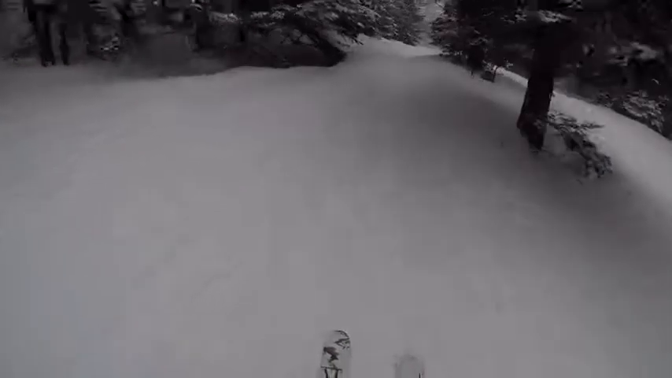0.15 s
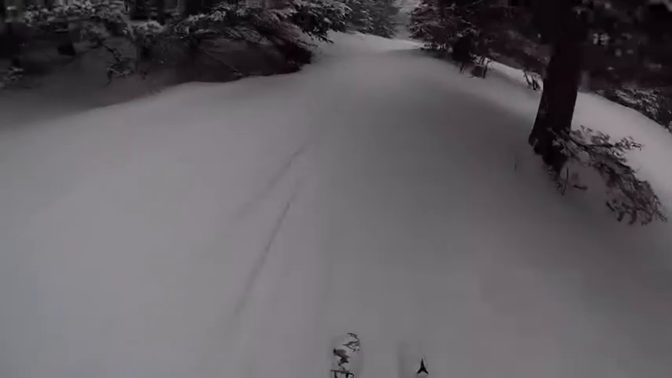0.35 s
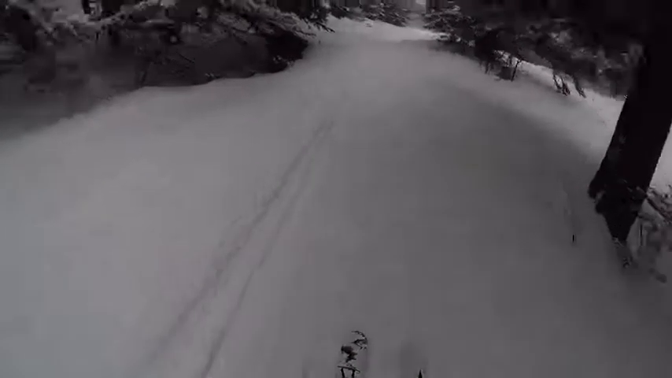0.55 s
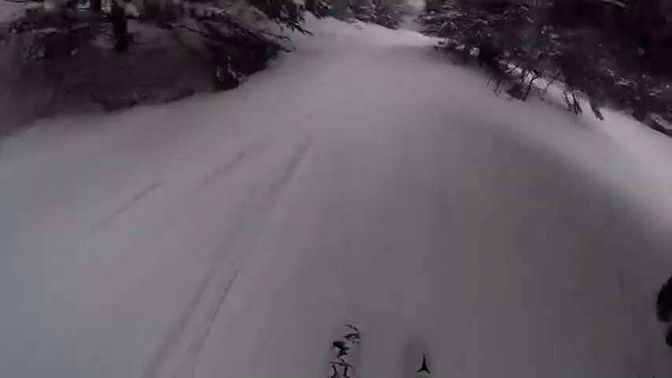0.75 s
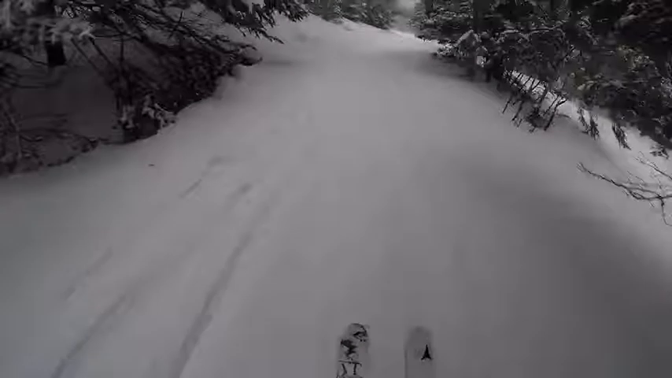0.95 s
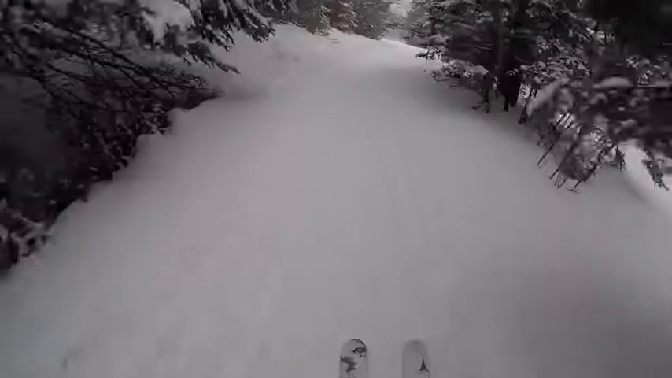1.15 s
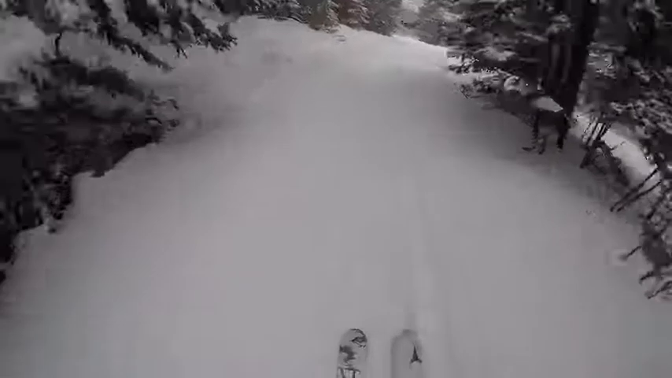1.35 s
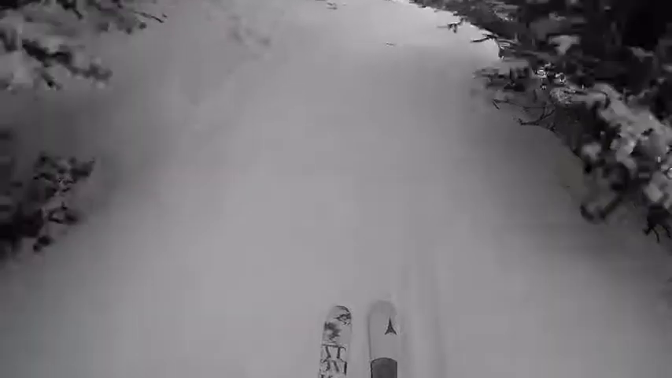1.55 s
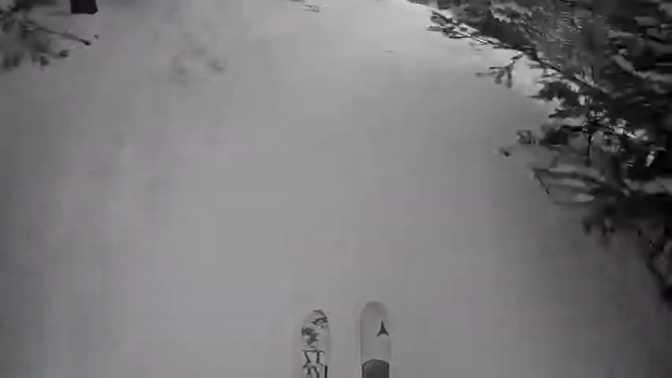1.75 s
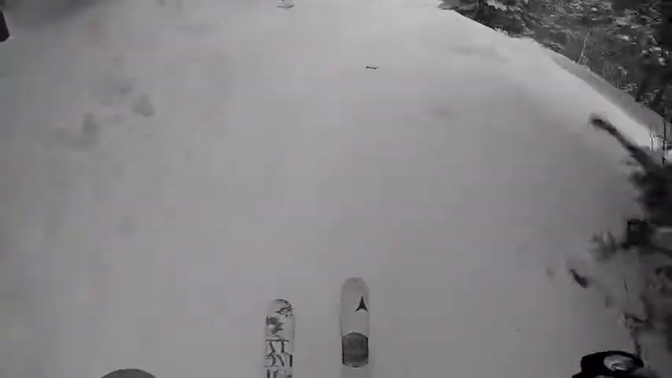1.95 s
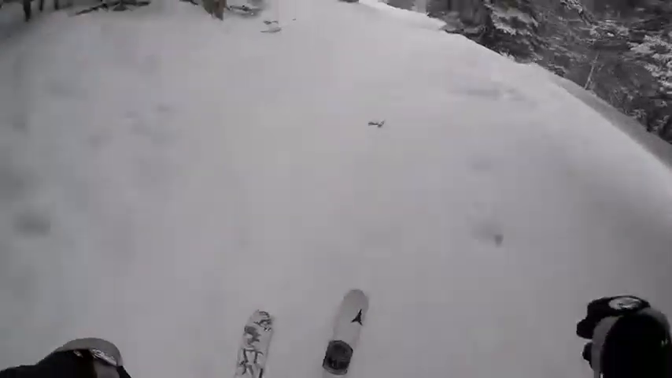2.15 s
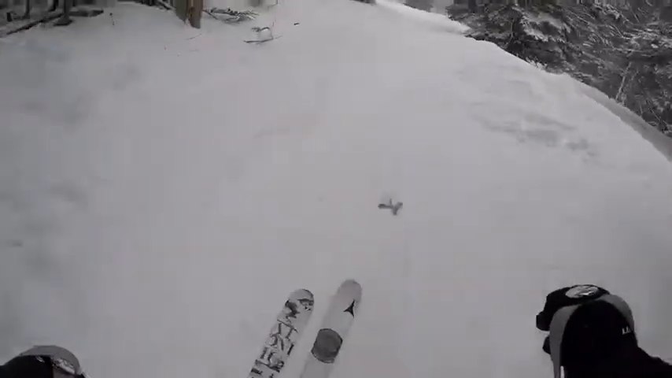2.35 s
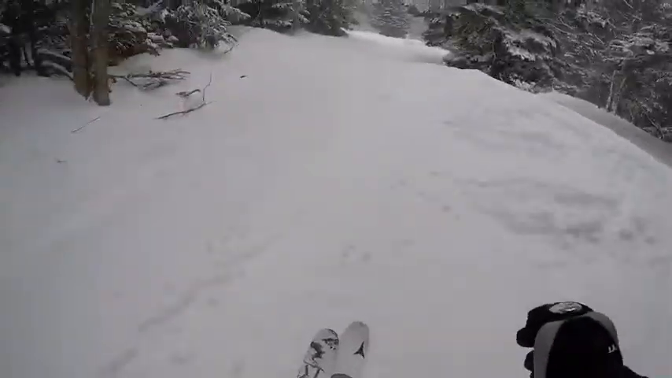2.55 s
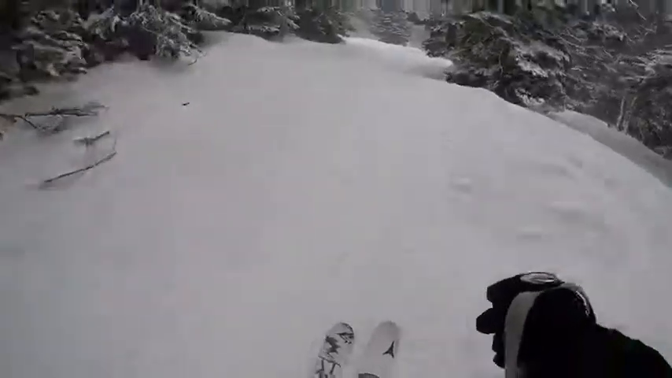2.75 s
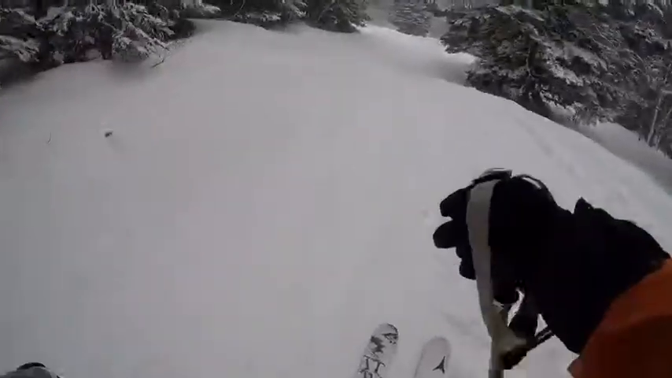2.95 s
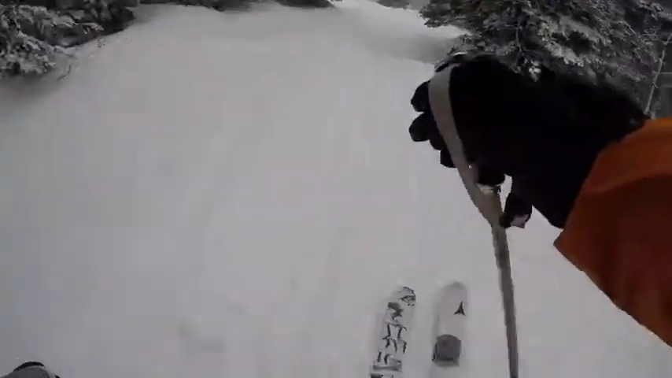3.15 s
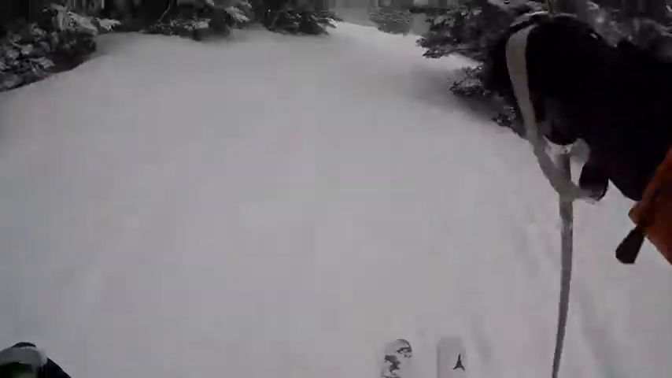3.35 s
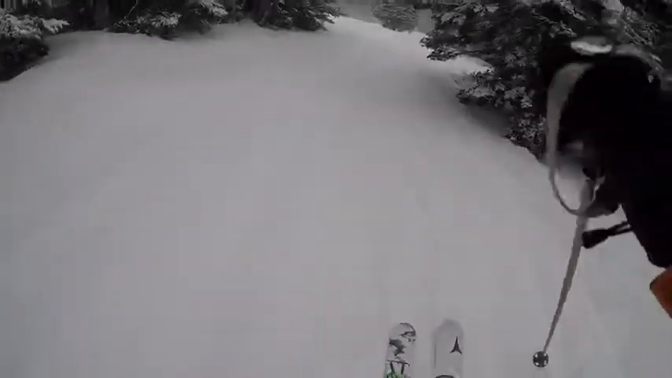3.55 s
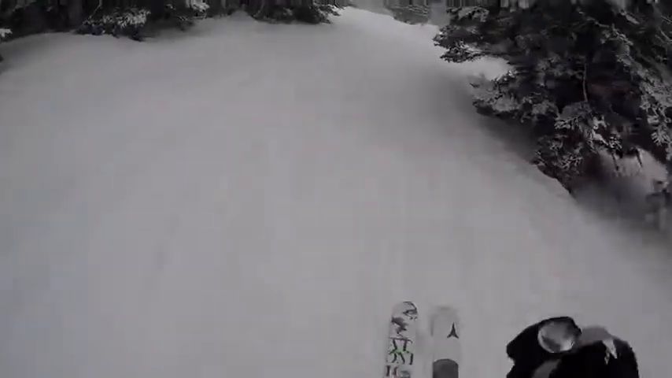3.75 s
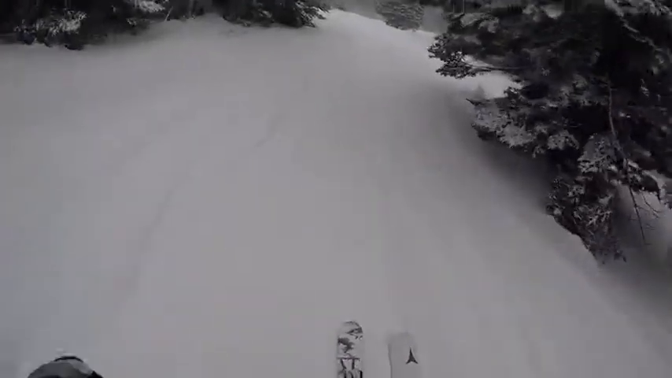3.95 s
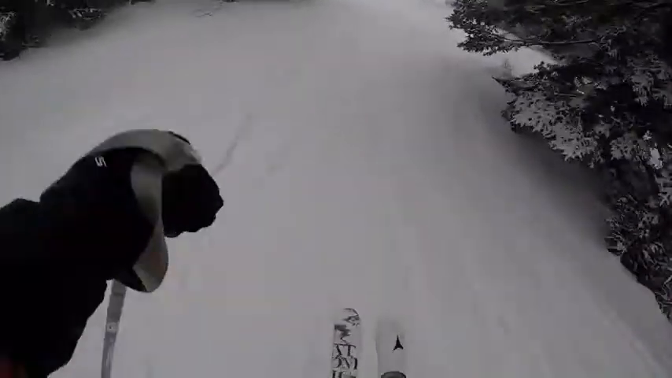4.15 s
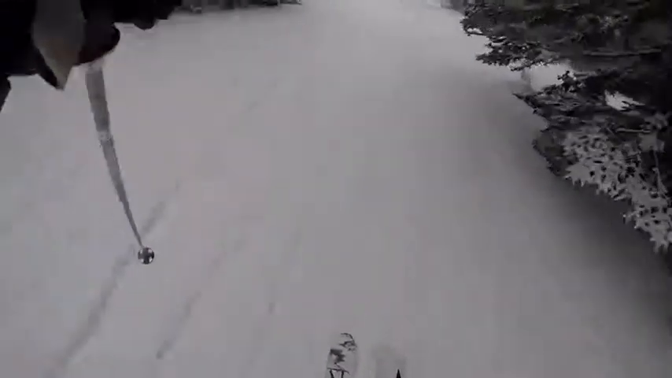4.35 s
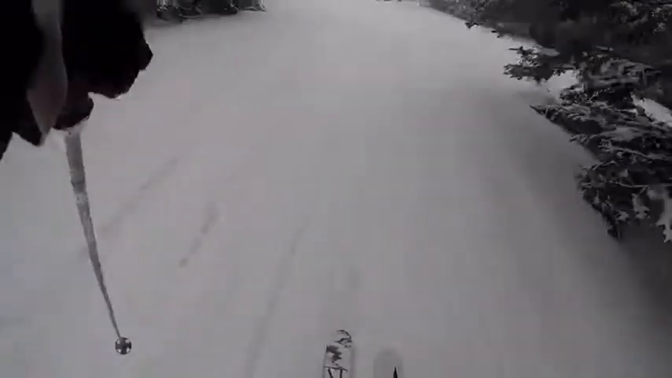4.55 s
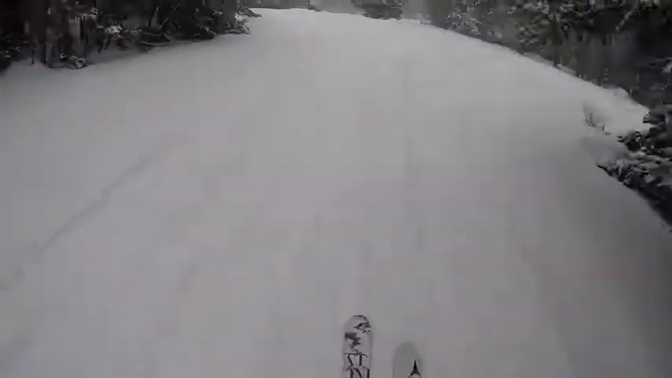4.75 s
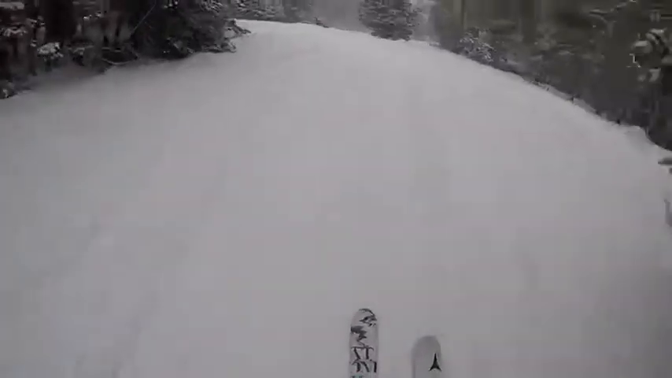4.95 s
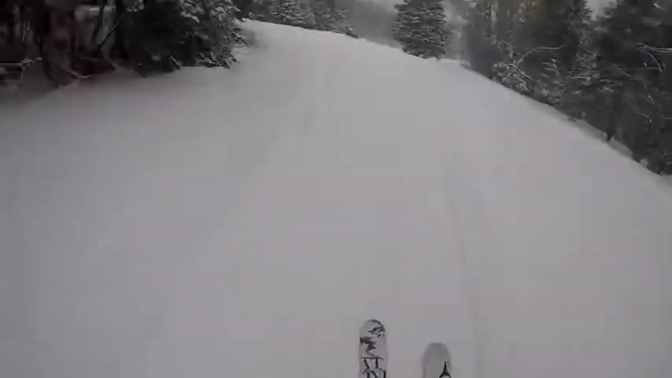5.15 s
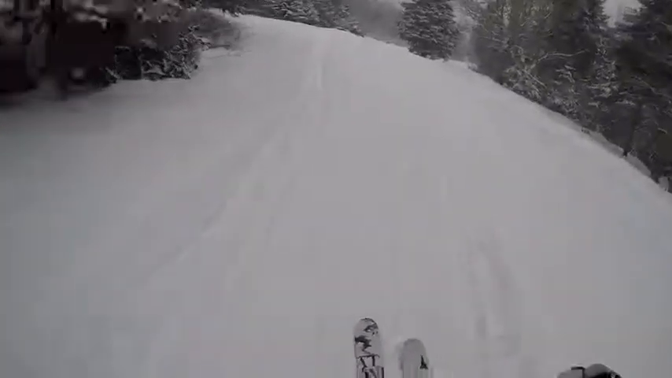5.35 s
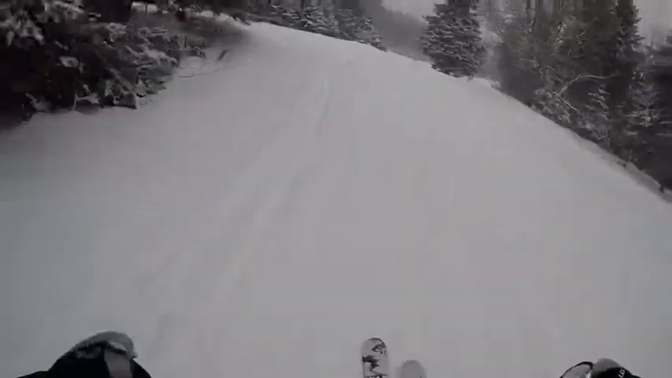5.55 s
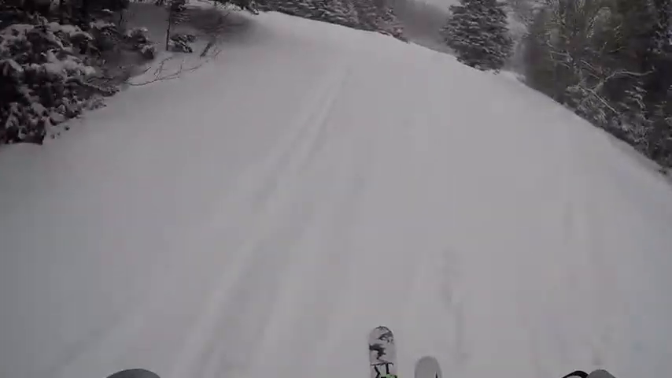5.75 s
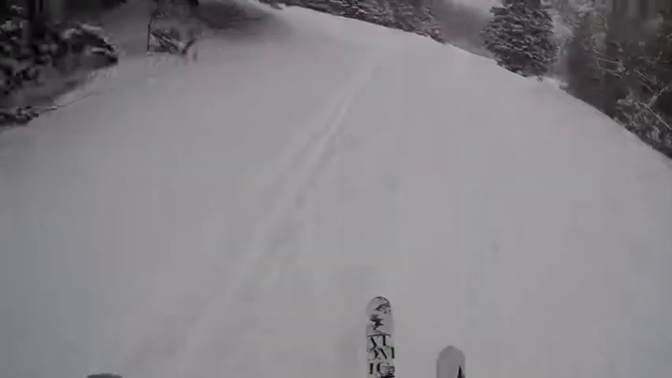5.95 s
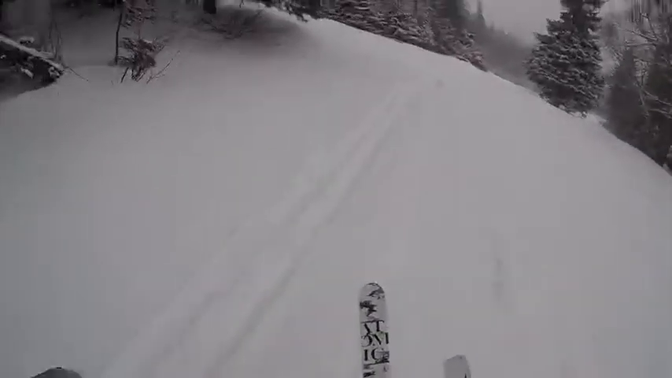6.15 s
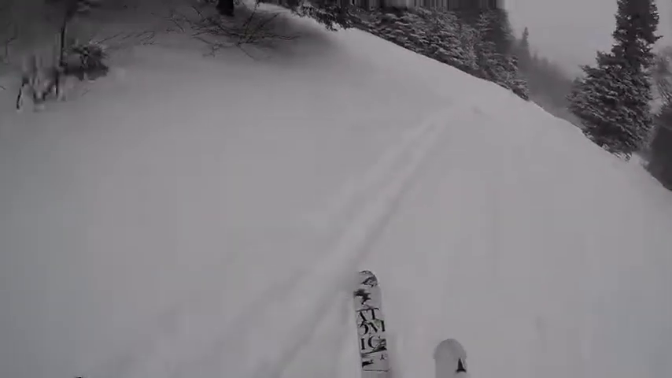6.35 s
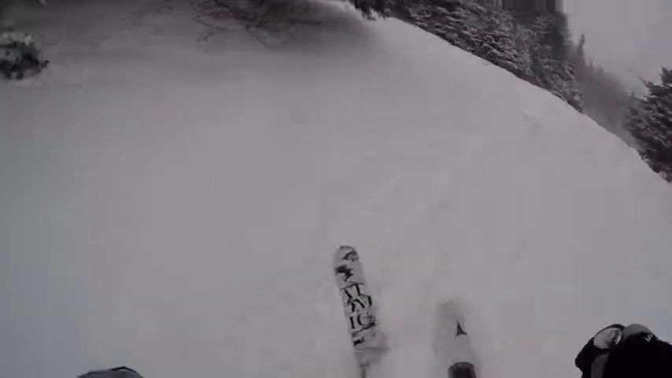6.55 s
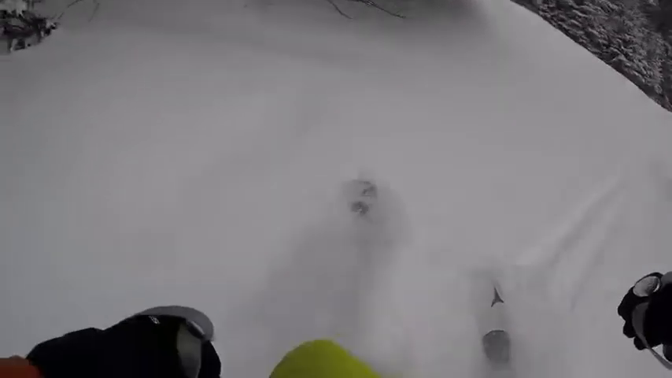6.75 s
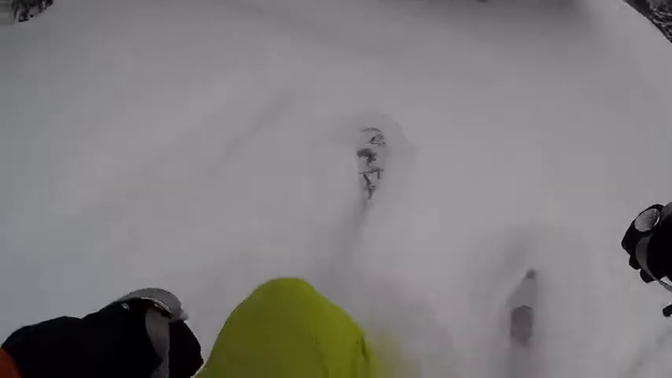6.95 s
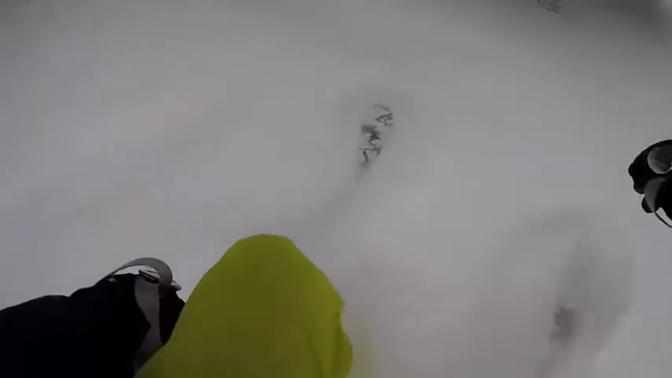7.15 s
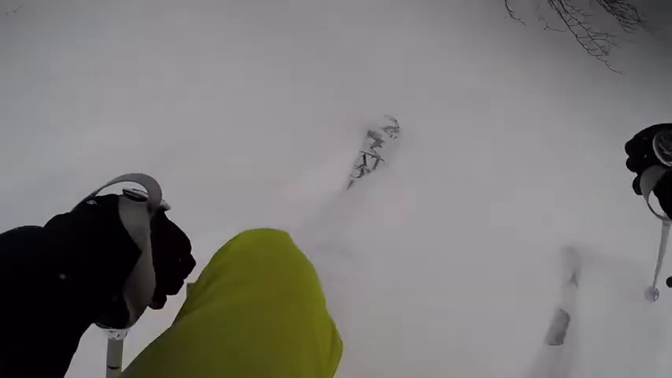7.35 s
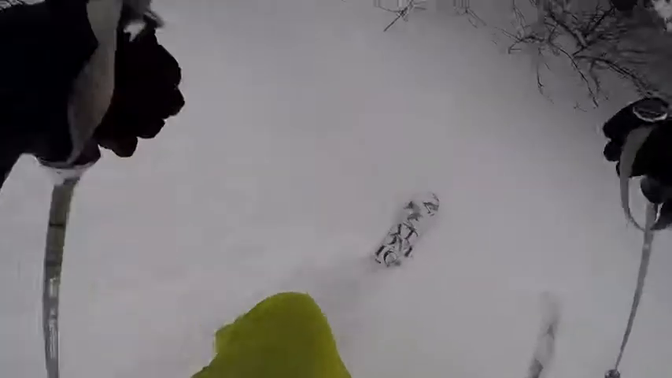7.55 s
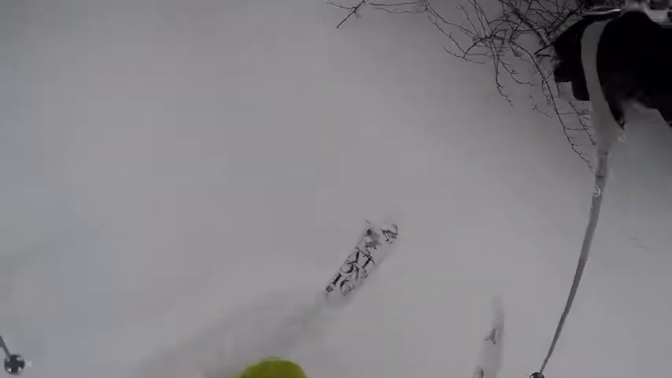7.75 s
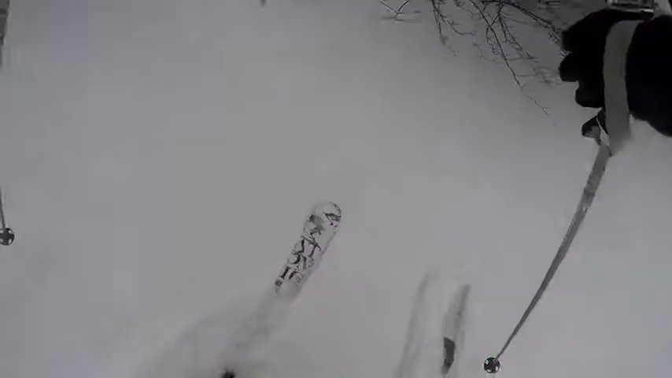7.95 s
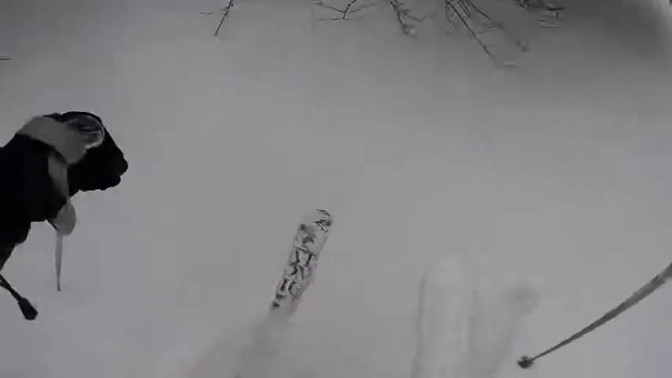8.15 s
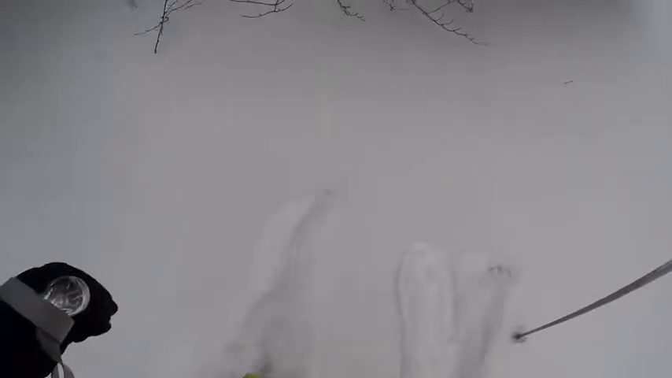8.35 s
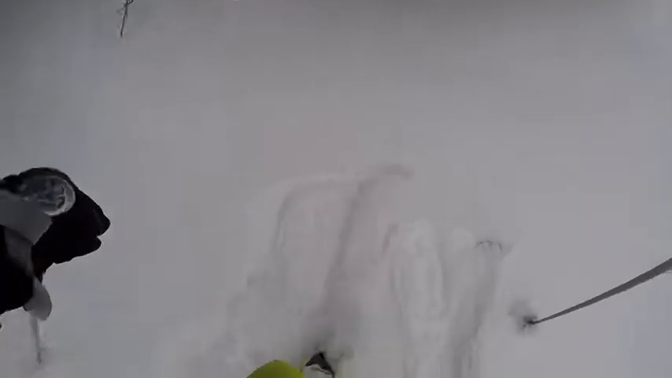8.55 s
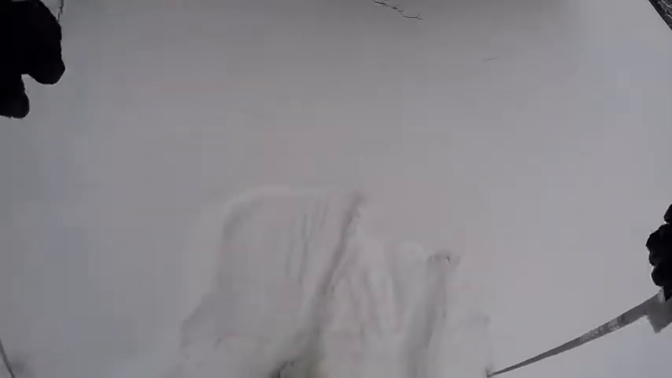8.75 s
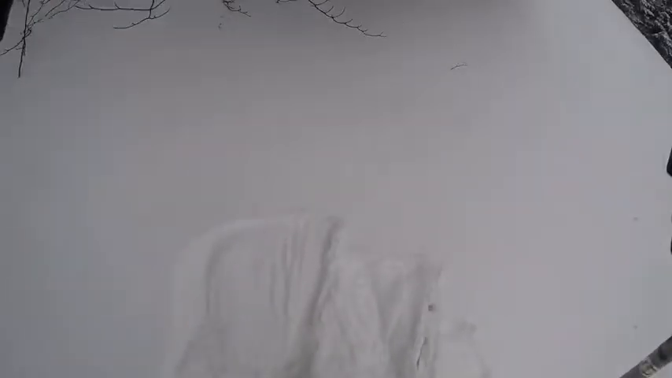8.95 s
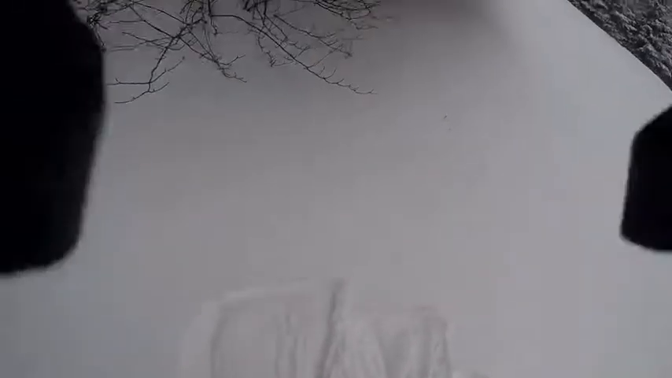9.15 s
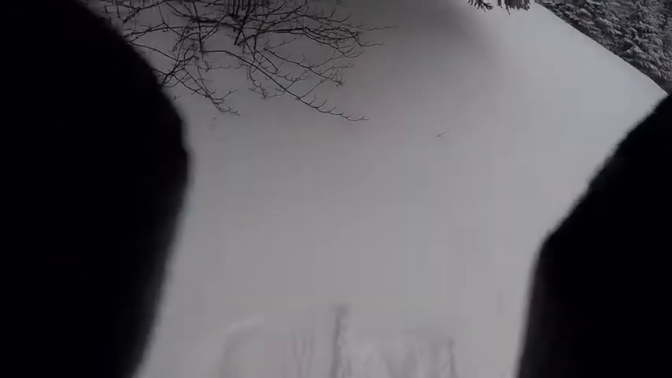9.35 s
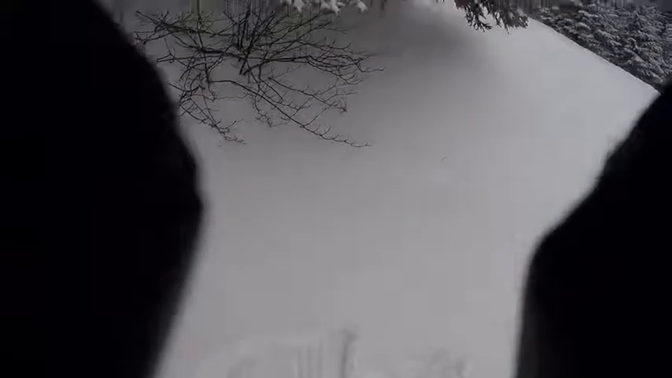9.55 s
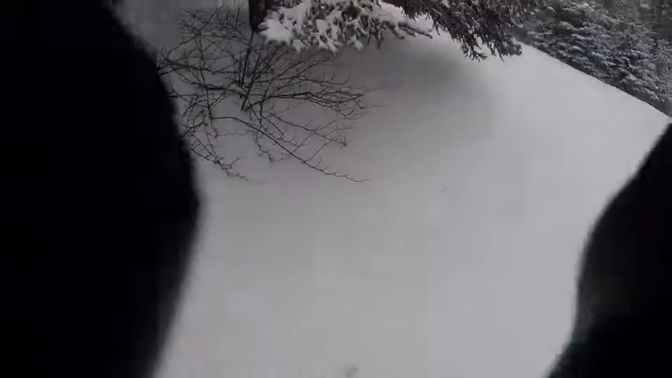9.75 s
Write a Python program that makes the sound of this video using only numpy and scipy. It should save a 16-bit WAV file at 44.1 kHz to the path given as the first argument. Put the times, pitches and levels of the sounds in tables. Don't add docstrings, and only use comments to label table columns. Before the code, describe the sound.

Very close, dry outdoor sound from a microphone inside a hard plastic housing worn by a skier. From 0 to 6.3 seconds, irregular crisp high ticks of flakes pepper the case over a thin snow hiss, quiet jacket rustle and soft low wind buffets. Straps creak and fabric snaps, with a stronger rustling jolt around 2.2-2.5; light metallic pole clinks come at 3.7 and 4.7. At 6.4 the ski edges bite, then spray and scrape harder from 6.8 to 7.4, singing and squealing on icy patches before sinking to a stop. Bright clinks at 7.55 and loud, hard pole knocks at 7.8 and 8.4 punctuate crunching, shuffling snow. From 9.2, gloves rub and stutter over the plastic, with clicks and low thumps; the hardest slaps and deepest thump hit around 9.5-9.6, then coarse rubbing continues to the end.

```python
import sys
import numpy as np
from scipy import signal
from scipy.fft import rfft, irfft
from scipy.io import wavfile
from scipy.ndimage import uniform_filter1d

SR = 44100
rng = np.random.default_rng(int(sys.argv[2]) if len(sys.argv) > 2 else 0)


def attenuation_scalar(level_db):
    decades = np.asarray(level_db, float) / 20
    return 10 ** decades


def wav_record(signal):
    frames = np.transpose(np.atleast_2d(signal))
    bounded = np.clip(frames, -1, 1)
    quanta = np.round(bounded * 32767).astype(np.int16)
    wavfile.write(sys.argv[1], SR, quanta)


N = 432621
CALM_RUSTLE_DB = -58.5

# t/s, edge pressure/dB, singing scrape re pressure/dB
EDGES = [
    (6.33, -63, -23),
    (6.425, -46.5, -6.5),
    (6.58, -55, -10),
    (6.82, -36.5, -12),
    (6.856, -44.5, -5),
    (7.06, -43.5, -8),
    (7.14, -49, -3.5),
    (7.3, -47, -6),
    (7.44, -61, -13),
]
# t/s, rub level/dB, rumble level/dB
HANDS = [
    (9.1, -66, -68),
    (9.241, -48, -37),
    (9.486, -60, -33.5),
    (9.553, -31, -45),
    (9.562, -20, -28),
    (9.6, -48, -25),
    (9.65, -46, -31),
    (9.81, -40.5, -23),
]
# f/Hz, level/dB
SPRAY_COLOUR = [(2500, -6), (3300, -2), (4900, -1.5), (5700, -11.5), (6700, -4), (8000, -12), (9300, -8),
                (11000, -16.5), (14500, -12.5), (16000, -39)]


def unit(x):
    return x / np.sqrt(np.mean(x ** 2))


def peak_at(x, db):
    return attenuation_scalar(db) * x / np.abs(x).max()


def curve(table, column):
    rows = np.array(table)
    return attenuation_scalar(np.interp(np.arange(N) / SR, rows[:, 0], rows[:, column], left=-120, right=-120))


def colour(x, points):
    size = 8192
    hz, db = np.transpose(points)
    bins_hz = np.arange(size // 2 + 1) * SR / size
    log_gain = np.log(attenuation_scalar(np.interp(np.log(bins_hz + 1), np.log(hz), db)))
    cepstrum = irfft(log_gain)
    cepstrum[1:size // 2] *= 2
    cepstrum[size // 2 + 1:] = 0
    response = irfft(np.exp(rfft(cepstrum)))
    return unit(signal.fftconvolve(x, response)[:N])


def band(x, hz, width):
    peak = signal.iirpeak(hz, hz / width, fs=SR)
    return unit(signal.lfilter(*peak, signal.lfilter(*peak, x)))


def walk(rate):
    hold = int(SR / rate)
    steps = np.repeat(rng.standard_normal(N // hold + 1), hold)
    return unit(uniform_filter1d(uniform_filter1d(steps, hold), hold)[:N])


def grit(rate, spread_db, grain_ms, hiss):
    sizes = attenuation_scalar(spread_db * np.minimum(rng.exponential(size=N), 3))
    slips = (rng.random(N) < rate / SR) * sizes
    puffs = signal.lfilter([1], [1, -np.exp(-1000 / (grain_ms * SR))], slips)
    return (unit(puffs) + hiss) * rng.standard_normal(N)


def ringing(modes, t):
    return sum(attenuation_scalar(g) * np.exp(-np.log(1000) * t / t60) * np.sin(2 * np.pi * hz * t) for hz, g, t60 in modes)


def add(out, times, grains):
    for s, grain in zip(times, grains):
        i = int(s * SR)
        out[i:i + len(grain)] += grain[:N - i]
    return out


def ticks(s, db, hz, spread, decay_ms, rise_ms, count):
    chance = rng.standard_normal((len(s), count, 3))
    t = np.arange(512) / SR
    freq = (hz * np.exp(spread * chance[..., 0].T)).T[..., None]
    tau = decay_ms / 1000 * np.exp(0.27 * chance[..., 1:2])
    audible = (freq < 15300) & (freq > 1250)
    modes = audible * np.exp(-t / tau) * np.sin(2 * np.pi * freq * t + 3 * chance[..., 2:])
    rings = modes.sum(axis=1) * (1 - np.exp(-t * 1000 / rise_ms))
    rings *= attenuation_scalar(db + 8.5)[:, None] / np.abs(rings).max(axis=1, keepdims=True)
    return add(np.zeros(N), s - .0005, rings)


def swell(rows):
    quickest_s, rise_share = .009, .9
    s, db, fall_s = np.transpose(rows)[:3, :, None]
    age = (np.arange(0, N, 64) / SR - s) / np.maximum(fall_s, quickest_s)
    return attenuation_scalar(2 * (db - 10 * np.maximum(age, -age / rise_share) ** 2.))


def smooth(power):
    return np.interp(np.arange(N), np.arange(0, N, 64), np.sqrt(power))


def pitched_hiss(rows, breadth):
    drag = grit(rate=300, spread_db=7.0, grain_ms=3.6, hiss=2.2)
    return sum(band(drag, row[3], breadth * row[3]) * smooth(power) for row, power in zip(rows, swell(rows)))


def wind():
    # f/Hz, level/dB
    wind_colour = [(8, -34), (20, 9.5), (44, -7), (90, -13.5), (160, -28), (400, -53)]
    # t/s, level/dB
    gusts = [(0, -47), (.5, -49), (.72, -43.5), (1.15, -54.5), (1.37, -48.5), (1.55, -56), (2.2, -50.5),
             (2.77, -41.5), (2.93, -50), (3.51, -39), (3.65, -46), (4.6, -47.5), (5.6, -43), (6.19, -45),
             (7.1, -45.5), (8.4, -44), (8.96, -51), (9.81, -40)]
    buffet = colour(rng.standard_normal(N) * attenuation_scalar(2.0 * walk(11)), wind_colour)
    return buffet * np.hypot(curve(gusts, column=1), curve(HANDS, column=2))


def sleet(rate, level_db, hiss_db, until_s):
    # t/s, strength/dB
    snowfall = [(0, -1), (.3, 6), (.5, -9), (1.2, 1.5), (1.9, -3), (2.3, 1.5), (3, 10), (3.4, 3), (3.6, -9),
                (4.6, 0.5), (4.85, 8), (5.5, 1), (5.7, 0), (6.1, 8), (6.6, -4)]
    s, size, pitch = rng.random((3, int(rate * until_s)))
    fade = np.clip(until_s + 1 - np.arange(N) / SR, .42, 1)
    hiss = band(rng.standard_normal(N), 11700, 9000) * attenuation_scalar(hiss_db) * fade
    db = level_db + 16 * size ** 1.6 + np.interp(s * until_s, *np.transpose(snowfall))
    return hiss + ticks(0.00054 + s * until_s, db, 6000 + 7000 * pitch,
                        spread=0.4, decay_ms=0.42, rise_ms=0.08, count=12)


def flakes():
    # t/s, peak level/dB, f/Hz
    heavy_flakes = [(0.085, -39, 7100), (0.093, -32, 9300), (0.143, -37, 7250), (0.185, -37, 7500),
                    (0.2426, -39.5, 6600), (0.4325, -42, 9200), (1.061, -44, 5960), (1.3797, -36, 8250),
                    (1.465, -40.5, 9450), (1.5313, -38.5, 11500), (1.7585, -41.5, 7540),
                    (1.8847, -36, 11400), (1.9286, -41, 9900), (2.0035, -37.5, 9000), (2.2085, -32.5, 6060),
                    (2.25, -35.5, 6160), (2.603, -42, 7260), (2.6717, -32, 8940), (2.6953, -39, 10500),
                    (2.752, -34.5, 8000), (2.8038, -39, 11300), (2.866, -32.5, 8500), (2.8978, -37.5, 8440),
                    (2.9516, -34, 9800), (3.0335, -36, 6700), (3.1372, -36.5, 10900), (3.147, -33, 8600),
                    (3.209, -40.5, 8560), (3.25, -35, 6170), (3.302, -38.5, 7300),
                    (3.6605, -43, 8900), (3.6964, -36.5, 7240), (3.749, -39, 6000), (4.0416, -36, 7430),
                   (4.191, -42.5, 11500), (4.4741, -37, 6700), (4.5888, -42, 6260), (4.734, -38.5, 5560),
                   (4.824, -39, 8150), (4.873, -36.5, 6100), (4.903, -39, 7930), (5.0278, -36.5, 5600),
                   (5.0642, -44, 7050), (5.1463, -39, 10260), (5.218, -39.5, 7850), (5.293, -31.5, 6430),
                   (5.3433, -31, 10000), (5.354, -33, 6930), (5.3928, -41, 10300), (5.4023, -37, 6200),
                   (5.444, -37, 8130), (5.491, -40, 8080), (5.609, -37, 7200), (5.782, -40, 11700),
                   (5.93, -40.5, 8400), (5.9754, -38, 7200), (6.0622, -36, 7900), (6.0765, -37.5, 9000),
                   (6.161, -38, 5650), (6.259, -41.5, 9000)]
    # t/s, peak level/dB
    fine_flakes = [(0.047, -49), (0.0676, -42), (0.0742, -50), (0.1004, -46), (0.11, -48.5), (0.1339, -42),
                   (0.2085, -45), (0.2215, -45), (0.26, -48), (0.7462, -51), (0.8117, -44), (0.9792, -46),
                   (1.071, -51), (1.2309, -47.5), (1.348, -50), (1.3555, -49), (1.3751, -43), (1.6118, -48),
                   (1.6287, -50), (1.6725, -50), (1.6986, -51), (1.7057, -45), (1.723, -44), (1.8069, -53),
                   (1.855, -44.5), (1.916, -45), (1.9366, -45), (1.9589, -50), (2.079, -45), (2.2044, -43),
                   (2.2134, -51), (2.263, -44), (2.312, -40), (2.4414, -47), (2.532, -42.5), (2.548, -44),
                   (2.6086, -39), (2.6216, -50), (2.6305, -47), (2.6916, -44), (2.7216, -49), (2.8138, -42),
                   (2.8886, -50), (2.9012, -62), (2.9191, -52), (2.9478, -43), (2.9606, -43), (2.9772, -47),
                   (2.998, -45), (3.1656, -48), (3.1907, -47), (3.212, -43), (3.2281, -49), (3.2692, -50),
                   (3.277, -44), (3.2918, -44), (3.2962, -44), (3.3156, -48), (3.3211, -45), (3.3708, -42),
                   (3.4185, -44.5), (3.4676, -50), (3.5391, -46), (3.619, -52), (3.7443, -44), (3.8179, -48),
                  (3.8553, -49), (3.8635, -50), (3.881, -51), (3.8894, -51.5), (3.9, -45), (4.009, -43),
                  (4.0728, -48), (4.1542, -53), (4.282, -50), (4.4182, -50), (4.5964, -45), (4.7229, -47),
                  (4.7664, -41.5), (4.7979, -51), (4.8031, -45.5), (4.8159, -46), (4.8558, -44),
                  (4.8826, -45), (4.9707, -47), (5.0211, -46), (5.0246, -49), (5.0982, -51.5),
                  (5.1135, -47.5), (5.1343, -49), (5.1994, -41.5), (5.2466, -47), (5.2563, -44),
                  (5.3369, -50), (5.349, -35.5), (5.3986, -39), (5.5025, -44), (5.5166, -44), (5.5621, -50),
                  (5.6126, -49), (5.629, -43), (5.6929, -46), (5.6961, -44), (5.7585, -42.5), (5.7918, -51),
                  (5.8072, -50), (5.823, -46.5), (5.923, -47), (5.9346, -47), (5.9492, -46), (6.0726, -41),
                  (6.0972, -45), (6.1005, -46), (6.137, -46), (6.225, -41), (6.2288, -47), (6.2328, -49),
                  (6.2564, -49), (6.5623, -50), (6.7463, -38)]
    # t/s, peak level/dB, f/Hz
    crumbs = [(6.3425, -41, 5230), (6.6257, -41, 11600), (6.752, -31.5, 6960), (6.915, -36, 9000),
              (2.025, -46, 9000), (8.393, -46, 11000), (7.0383, -38, 5200), (7.554, -41, 4400),
              (7.645, -44.5, 7850), (7.739, -44, 5230), (8.222, -41, 5200), (8.452, -39.5, 4760),
              (8.805, -40, 6700), (8.8958, -41.5, 4900), (9.1867, -43, 4940), (9.2362, -36.5, 5500),
              (9.256, -35, 5200), (9.2853, -33, 4800), (9.3045, -39, 9000), (9.333, -35, 5400),
              (9.3628, -32.5, 4760), (9.567, -40, 5730), (2.0486, -43, 8500), (9.637, -30.5, 7660),
              (9.7077, -30, 8900), (9.715, -27, 7900), (9.7232, -22.5, 7700), (9.7772, -43, 9600),
              (9.7894, -27.5, 7670)]
    heavy = ticks(*np.transpose(heavy_flakes), spread=0.456, decay_ms=0.79, rise_ms=0.11, count=24)
    s, db = np.transpose(fine_flakes)
    fine = ticks(s, db + 2.5, hz=9000, spread=0.515, decay_ms=0.62, rise_ms=0.06, count=20)
    ice = ticks(*np.transpose(crumbs), spread=0.308, decay_ms=0.64, rise_ms=0.12, count=24)
    return heavy + fine + ice + sleet(rate=66, level_db=-66.0, hiss_db=-71.0, until_s=6.6)


def creaks():
    # t/s, peak level/dB
    strap_creaks = [(1.062, -50), (1.4104, -38.5), (1.5322, -42.5), (1.9537, -38), (2.0652, -33.5),
                    (2.1828, -34.5), (2.212, -28.5), (2.335, -27), (2.6733, -39.5), (2.696, -40),
                    (2.8655, -40.5), (3.0657, -33.5), (3.6986, -37), (4.0517, -38), (4.3086, -41.5),
                    (4.472, -39.5), (4.5887, -41.5), (4.7919, -42.5), (4.901, -33), (4.999, -37.5),
                    (5.0387, -42), (5.167, -28.5), (5.343, -39), (5.6285, -56), (5.892, -44),
                    (6.7636, -32.5), (7.3425, -46)]
    # t/s, peak level/dB
    crunches = [(7.5115, -39), (7.529, -42), (7.7385, -30), (7.8065, -53.5), (8.082, -32.5), (8.105, -32.5),
                (8.166, -28), (8.418, -32.5), (8.452, -37), (8.8944, -33), (8.944, -39), (9.0795, -39),
                (9.1868, -35), (9.2287, -31), (9.2385, -21.5), (9.2569, -26), (9.3216, -20), (9.332, -18),
                (9.679, -31), (9.7183, -28), (9.789, -27)]
    # t/s, peak level/dB, f/Hz
    snaps = [(0.1012, -43.5, 2230), (1.436, -49, 2130), (1.6122, -54, 2090), (2.0034, -37.5, 3600.0),
             (2.2182, -34, 2280), (2.3067, -31, 1790), (2.483, -33, 1900.0), (2.4857, -39, 1970),
             (2.604, -40.5, 2900.0), (3.2504, -42, 2600), (3.438, -38, 1990), (3.9008, -41.5, 2620),
             (4.046, -44, 1900.0), (4.102, -41, 2240), (5.146, -43, 2070), (5.3139, -38, 2160),
             (5.629, -42, 2660), (5.808, -48, 2400.0), (6.1982, -37.5, 2000.0), (6.344, -40.5, 2300.0),
             (7.342, -38, 1870), (7.499, -42, 2020), (7.531, -35, 2040), (7.7497, -33, 2070),
             (7.769, -36.5, 2000.0), (7.809, -35, 2050), (7.8977, -38, 2080), (8.1316, -37, 2150),
             (8.19, -36, 2010), (9.0733, -42, 1860), (9.2493, -33, 2260), (9.287, -28, 2440),
             (9.3635, -31, 2600.0), (9.6369, -30.5, 2310), (9.6927, -29, 1990), (9.768, -30, 2660)]
    s, db = np.transpose(strap_creaks + crunches)
    slips = ticks(s, db, hz=2118, spread=0.13, decay_ms=1.33, rise_ms=0.44, count=10)
    return slips + ticks(*np.transpose(snaps), spread=0.15, decay_ms=1.2, rise_ms=0.29, count=10)


def movements():
    # t/s, rustle level/dB, 10 dB fall/s, spray re rustle/dB
    sways = [(0.126, -59.5, 1.1, -5), (0.445, -48, 0.09, -12), (0.61, -49, 0.07, -14),
             (0.859, -44.5, 0.03, -7.5), (1.226, -51.5, 0.1, -8.5), (1.404, -51, 0.09, -8.5),
             (1.943, -54, 0.14, -7), (2.061, -45, 0.09, -10), (2.214, -37.5, 0.016, -4.5),
             (2.266, -37.5, 0.017, -4.5), (2.337, -28.5, 0.038, -5.5), (2.379, -39.5, 0.02, -2),
             (2.415, -46.5, 0, -3), (2.499, -36.5, 0.0224, -5.5), (2.632, -47.5, 0.07, -6),
             (3.093, -50, 0.29, -4), (3.342, -45, 0.21, -13.5), (3.74, -49, 0.11, -9),
             (3.886, -49, 0.1, -7.5), (4.06, -44, -0.02, -9.5), (4.378, -46, 0.06, -15),
             (4.597, -51, 0, -11), (4.69, -61, 1.5, -10), (4.731, -53.5, 0.23, -6),
             (4.966, -44, 0.1256, -7.5), (5.2, -51, 0.23, -10.5), (5.37, -46.5, 0.09, -7),
             (5.527, -45.5, 0.025, -3.5), (5.68, -55, 0.47, -6), (5.97, -50.5, 0, -1.5),
             (6.207, -47.5, 0.1, -3)]
    # t/s, rustle level/dB, 10 dB fall/s, spray re rustle/dB
    shuffles = [(6.76, -45, -0.0059, -2), (7.552, -33.5, 0.02, -16.5), (7.676, -42.5, 0.17, -10.5),
                (7.776, -39, 0.07, -20), (7.888, -52, 0.8, -33), (8.148, -38, 0.0951, -12.5),
                (8.185, -36.5, 0.025, -12.5), (8.325, -54.5, -0.1, -9), (8.412, -54, -0.15, -11.5),
                (8.561, -52.5, 0.15, -27), (8.789, -38.5, -0.05, -12.5), (8.968, -45, 0.34, -13),
                (9.242, -34, 0, -21.1), (9.288, -38.5, 0.08, -5.5), (9.329, -33, 0, -11),
                (9.407, -30.5, 0.0354, -12.5), (9.539, -35, 0.06, -11), (9.612, -33, 0.01, -12),
                (9.754, -33, 0.09, -7)]
    rows = sways + shuffles
    power = swell(rows)
    spray_db = np.transpose(rows)[3, :, None]
    motion = smooth(power.sum(axis=0) + attenuation_scalar(2 * CALM_RUSTLE_DB))
    thrown = smooth((power * attenuation_scalar(2 * spray_db)).sum(axis=0) + attenuation_scalar(2 * -61.5))
    return np.hypot(motion, attenuation_scalar(2.5) * curve(EDGES, column=1)), thrown


def rustle(slips):
    # f/Hz, level/dB
    housing_colour = [(900, -26), (1330, -18), (1600, -3), (1900, 0), (2300, -2.5), (2800, -9),
                      (3200, -16.5), (4200, -39)]
    return colour(slips * grit(rate=260, spread_db=1.5, grain_ms=2.2, hiss=1.0), housing_colour)


def powder(slips):
    spray = colour(slips * grit(rate=350, spread_db=3.5, grain_ms=2.5, hiss=0.9), SPRAY_COLOUR)
    return signal.lfilter(*signal.butter(2, 10500, fs=SR), spray)


def body_rub(slips, motion):
    # f/Hz, level/dB
    rub_colour = [(70, -36.5), (150, 1), (400, -5), (800, -6), (1300, -17), (1800, -51)]
    calm_rub_db, follow = -66.5, 0.49
    rub = colour(slips * grit(rate=60, spread_db=2.0, grain_ms=6.1, hiss=1.6), rub_colour)
    moving = attenuation_scalar(calm_rub_db) * (motion / attenuation_scalar(CALM_RUSTLE_DB)) ** follow
    return rub * np.hypot(moving, curve(HANDS, column=1))


def ride():
    slips = attenuation_scalar(1.6 * walk(60))
    motion, thrown = movements()
    return rustle(slips) * motion + powder(slips) * thrown + body_rub(slips, motion)


def edge_spray():
    sheet = colour(grit(rate=300, spread_db=4.0, grain_ms=3.3, hiss=1.25), SPRAY_COLOUR)
    return sheet * curve(EDGES, column=1)


def edge_scrape():
    # f/Hz, width/Hz, level/dB
    scrape_bands = [(1680, 420, 4), (5200, 620, -1.5), (6100, 1100, 1), (7500, 2400, -3)]
    shear = grit(rate=400, spread_db=2.5, grain_ms=1.8, hiss=1.1) * attenuation_scalar(2.0 * walk(30))
    song = sum(attenuation_scalar(db + 4.6 * walk(11)) * band(shear, hz, width) for hz, width, db in scrape_bands)
    return song * curve(EDGES, column=1) * curve(EDGES, column=2)


def squeals():
    # t/s, level/dB, 10 dB fall/s, f/Hz
    icy_patches = [
        (6.83, -50, -0.1, 5360),
        (6.89, -46.5, 0.17, 5130),
        (7.045, -39.5, 0.03, 5250),
        (7.08, -42, -0.82, 6700),
        (7.22, -47, 0.13, 5130),
        (6.9, -49, 0.03, 1670),
    ]
    return pitched_hiss(icy_patches, breadth=0.094)


def swishes():
    # t/s, level/dB, 10 dB fall/s, f/Hz
    brief_scuffs = [(5.382, -47.5, -0.15, 600), (5.525, -53, -0.12, 800), (4.955, -58.5, 0.07, 350),
                    (6.742, -52, 0.008, 900), (6.777, -51, 0.12, 600), (6.935, -53, 0.11, 800),
                    (9.305, -50.5, 0.14, 12200), (9.693, -36.5, -0.0546, 7200), (9.74, -47.5, 0.16, 10500),
                    (9.712, -39, -0.05, 8400), (9.722, -29, 0.0243, 680)]
    return pitched_hiss(brief_scuffs, breadth=0.85)


def clinks():
    # t/s, peak level/dB, lowest mode f/Hz, upper modes level/dB
    brushes = [
        (3.744, -23, 1554, -7.5),
        (4.7197, -27, 1630, -8),
        (7.5415, -23.5, 1680, -15),
        (7.553, -19, 1770, -4),
    ]
    # f/Hz, level/dB, t60/s
    tube_modes = [(2400, -2, 0.047), (2800, 3.5, 0.056), (3660, 2, 0.029), (4900, -1, 0.02)]
    t = np.arange(4096) / SR
    grains = []
    for s, db, low_hz, upper_db in brushes:
        modes = [(low_hz, 0, .04)] + [(hz, g + upper_db, t60) for hz, g, t60 in tube_modes]
        grains.append(peak_at(ringing(modes, t) * (1 - np.exp(-t / 0.00048)), db))
    return add(np.zeros(N), [k[0] for k in brushes], grains)


def knocks():
    # t/s, peak level/dB, contact/ms, first pitch f/Hz, pitch rise over the contact, damping by the grip
    pole_hits = [
        (7.7931, 7, 3.23, 1813, 0.21, 1),
        (8.3862, 5, 2.7, 1477, 0.4, 1.26),
    ]
    # f/Hz, level/dB, t60/s
    push_modes = [(1900, -4, 0.012), (2240, -10, 0.009), (2880, -0.5, 0.012), (3350, -1, 0.007)]
    # f/Hz, level/dB, t60/s
    touch_modes = [(99, -28.5, 0.052), (600, -20, 0.014), (873, -26, 0.057), (1120, -26, 0.042),
                   (3355, -2.5, 0.013), (3720, -4, 0.012), (4770, -4, 0.012), (5200, -9.5, 0.0048),
                   (6700, -8, 0.0094), (8900, -2, 0.0058), (9920, -0.5, 0.0044)]
    t = np.arange(4096) / SR
    rattle = uniform_filter1d(rng.standard_normal((len(pole_hits), 4096)), size=3)
    ring = ringing(push_modes, t)
    grains = []
    for (s, db, ms, hz0, rise, damping), noise in zip(pole_hits, rattle):
        strike = ringing([(hz, g, t60 / damping) for hz, g, t60 in touch_modes], t)
        strike *= 1 - np.exp(-(t / 0.00037) ** 2)
        age = t * 1000 / ms
        chirp = np.sin(2 * np.pi * hz0 * t * (1 + rise * age))
        push = chirp * np.exp(-age ** 3) * (1 - np.exp(-(age / 0.24) ** 2))
        body = peak_at(np.convolve(ring, push)[:len(t)], -4)
        crack = attenuation_scalar(19.0) * noise * age * np.exp(-age / 0.17)
        grains.append(peak_at(push + body + attenuation_scalar(-1.0) * strike + crack, db))
    return add(np.zeros(N), [k[0] for k in pole_hits], grains)


def grip():
    # t/s, level/dB
    glove_drag = [
        (9.2, -58),
        (9.27, -41),
        (9.36, -39.5),
        (9.388, -32),
        (9.435, -35.5),
        (9.47, -52),
        (9.708, -42),
        (9.722, -27.5),
        (9.81, -38),
    ]
    drag = grit(rate=290, spread_db=6.5, grain_ms=2.5, hiss=0.87)
    return (band(drag, 2860, 1200) + attenuation_scalar(-22.0) * band(drag, 800, 230)) * curve(glove_drag, column=1)


def slaps():
    # t/s, peak level/dB, contact/ms, low modes level/dB
    knuckles = [
        (9.52, -8, 0.1, -18),
        (9.5215, -0.5, 0.22, -12.5),
        (9.5566, 5.5, 0.099, -4.5),
        (9.5588, -9, 0.14, -9),
        (9.6004, 0.5, 0.079, -19),
        (9.6187, -14.5, 0.17, -10),
    ]
    # f/Hz, level/dB, t60/s
    held_modes = [(170, -15, 0.05), (277, -5.5, 0.081), (453, -5, 0.078), (570, -5, 0.074),
                  (1580, -5.5, 0.01), (1700, -4.5, 0.0099), (2230, 1, 0.01), (2930, -7, 0.009),
                  (3200, 1.5, 0.0076), (4200, -25, 0.007), (4450, -4, 0.0065), (6900, -22, 0.0024),
                  (9200, -22, 0.0023)]
    t = np.arange(4096) / SR
    early = t[:256]
    rattle = rng.standard_normal((len(knuckles), 256)) * np.exp(-early / 0.001)
    grains = []
    for (s, db, ms, low_db), shake in zip(knuckles, rattle):
        ring = ringing([(hz, g + low_db * (hz < 700), t60) for hz, g, t60 in held_modes], t)
        push = np.exp(-(early * 1000 / ms) ** 2)
        grains.append(peak_at(np.convolve(ring, push + 0.46 * shake), db))
    return add(np.zeros(N), [k[0] for k in knuckles], grains)


def thumps():
    # t/s, peak level/dB, first swing/ms, decay/ms
    presses = [
        (9.217, -19.5, 6, 37),
        (9.334, -9, 5.9, 29),
        (9.434, -22.5, 2.8, 12),
        (9.522, -14, 2.3, 6.5),
        (9.5586, -1.5, 3.1, 14),
        (9.6026, -6.5, 2, 4.2),
        (9.686, -13, 9.9, 35),
    ]
    ms = np.arange(8192) * 1000 / SR
    grains = [attenuation_scalar(db) * np.exp(-ms / decay) * np.sin(3.68 * np.log(1 + ms / swing))
              for s, db, swing, decay in presses]
    return add(np.zeros(N), [k[0] for k in presses], grains)


def scene():
    weather = wind() + flakes()
    skier = creaks() + ride() + swishes()
    skis = edge_spray() + edge_scrape() + squeals()
    poles = clinks() + knocks()
    gloves = grip() + slaps() + thumps()
    return (weather + skier + skis + poles + gloves)[None]


def roll_off(x):
    return signal.sosfilt(signal.butter(12, 16530, fs=SR, output="sos"), x)


def record(dry):
    top = signal.ellip(5, .3, 16, 15200, fs=SR, output="sos")
    mix = signal.sosfiltfilt(top, np.clip(dry, -.88, .88))
    return roll_off(mix)


dry = scene()
out = record(dry)
wav_record(out)
```